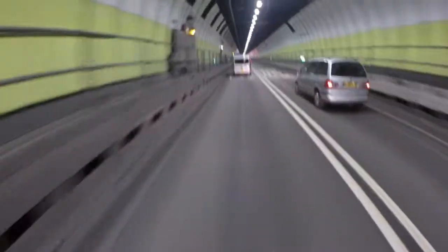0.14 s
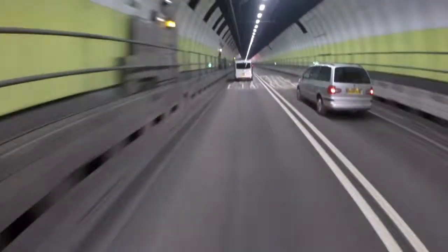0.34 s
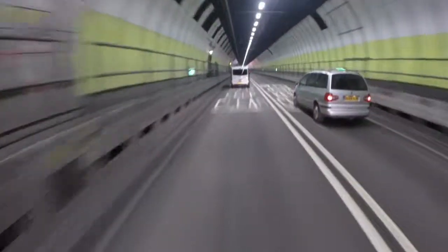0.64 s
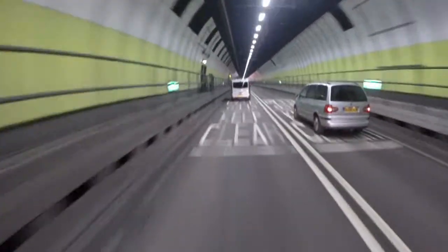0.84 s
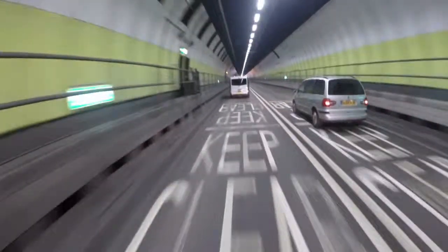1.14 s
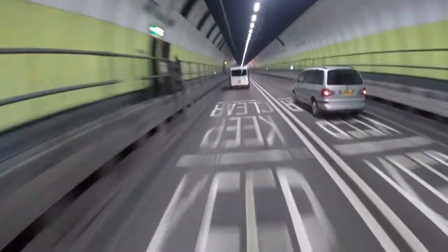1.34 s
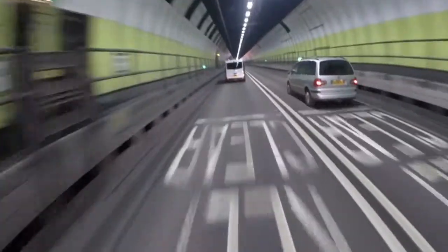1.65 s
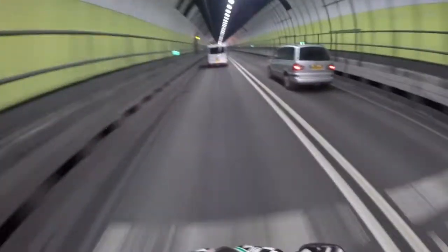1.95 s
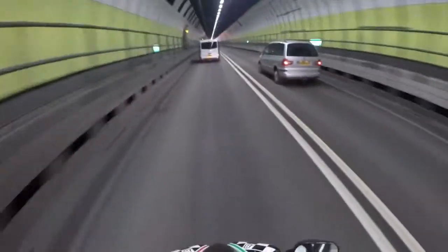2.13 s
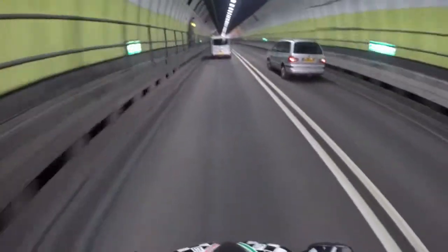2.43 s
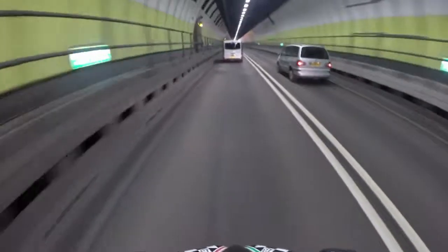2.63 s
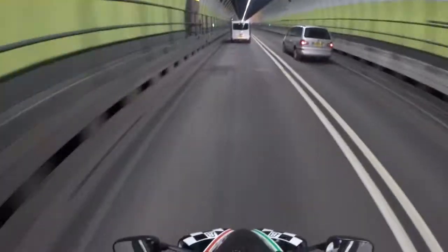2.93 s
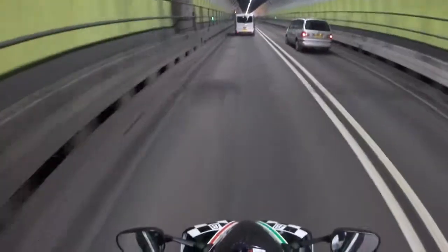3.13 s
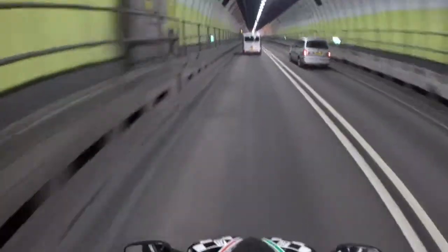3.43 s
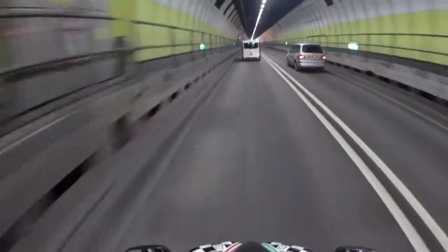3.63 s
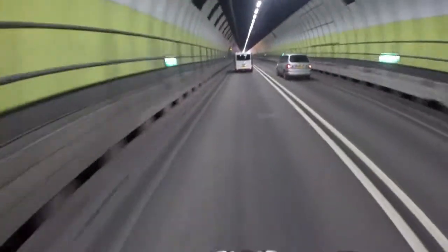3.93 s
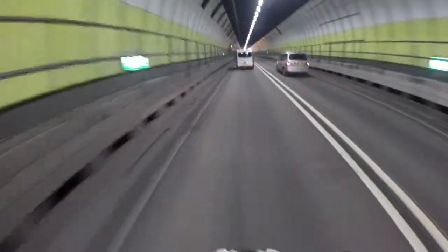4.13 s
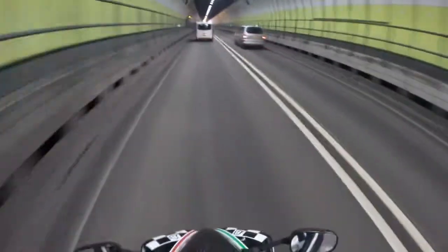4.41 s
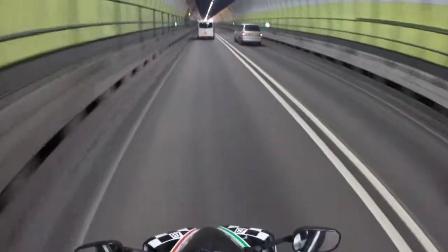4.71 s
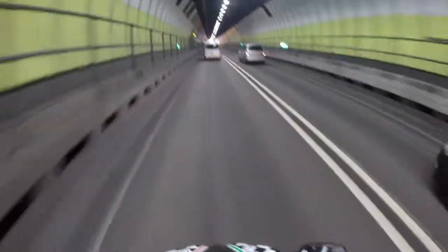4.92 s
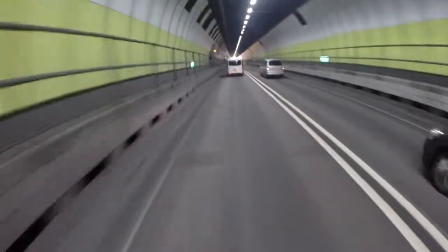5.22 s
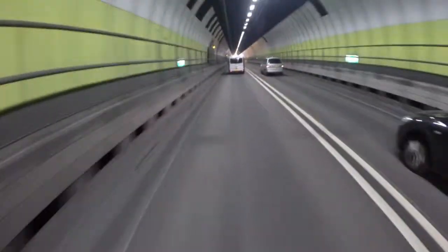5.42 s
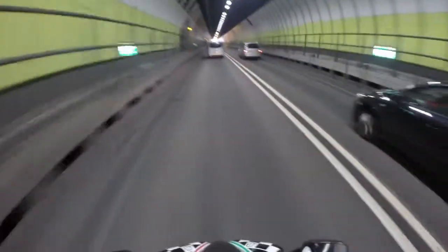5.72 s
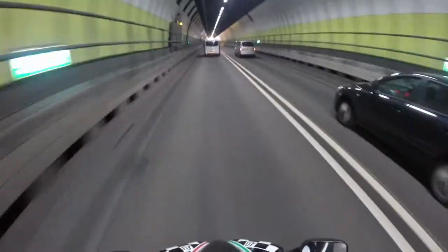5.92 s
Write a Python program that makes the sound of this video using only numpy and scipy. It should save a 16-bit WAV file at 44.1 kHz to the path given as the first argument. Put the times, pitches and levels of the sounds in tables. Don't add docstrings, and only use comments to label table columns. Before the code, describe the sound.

Inside an echoing road tunnel, a helmet microphone catches a twin-cylinder motorcycle with a loud open exhaust. From 0 to 4 seconds it coasts down, its deep uneven drone slowly sinking in pitch. Hard misfire thumps land near 0.8, 1.3, 2.1 and 2.3 seconds, with weaker pops between, and the burble is roughest from about 2.1 to 3.2. Tyre roar swells and fades, thin airy whines slide downward, and low wind gusts buffet the microphone, strongest near 3.1. Small grit ticks click at about 1.3 and 2.3. At 4.0 the gear changes: the note dips sharply, leaps up and wobbles through two clutch bites with clustered thumps until 4.8. Then the engine pulls away gently, steadier and slowly rising, with a pop near 5.5. A car drawing level adds brighter tyre hiss to the end at about 6 seconds. Big thumps momentarily duck everything.

```python
import sys
import numpy as np
from scipy import signal
from scipy.io import wavfile

SR = 44100
rng = np.random.default_rng(int(sys.argv[2]) if len(sys.argv) > 2 else 0)


def undo_db(level):
    steps = np.asarray(level, float) / 20
    return 10 ** steps


def bounce(signal):
    frames = np.transpose(np.atleast_2d(signal))
    limited = np.clip(frames, -1, 1)
    pcm = np.round(limited * 32767).astype(np.int16)
    wavfile.write(sys.argv[1], SR, pcm)


N = 267246

# (time [s], rate [cycles/s])
CRANK_SPEED = [(0, 34.2), (.15, 33.2), (.8, 31.7), (1.5, 29.95), (2.13, 28.65), (2.85, 26.9), (3.1, 27.1),
               (3.6, 26.4), (4.03, 26.8), (4.14, 23.1), (4.25, 31.1), (4.39, 27.9), (4.49, 30.6),
               (4.56, 29.5), (4.66, 31.2), (4.78, 30.2), (5.2, 30.9), (6.06, 32.5)]
# (time [s], throttle opening [0-1], level [dB])
THROTTLE = [(0, 0, -3), (.2, 0.05, 1), (.75, 0, -0.1), (.88, 0.1, -2.5), (1.35, 0.1, -1.5),
            (1.9, 0.13, 2.5), (2.3, 0, -1), (2.83, 0.3, 3.6), (2.95, 0.56, -1.5), (3.2, .95, -0.3),
            (4.05, 1, -1.3), (4.09, 0, -5), (4.2, 0.8, 2.5), (4.27, 0.4, -5), (4.41, 0.2, 2),
            (4.55, 0.23, -6.5), (4.72, 1, 1), (6.06, 0.8, -1)]
# (order [per cycle], throttle shut [dB], throttle open [dB])
LEAD_ORDERS = [(3, -18, -36.5), (5, -20.5, -15), (8, -22.5, -19.5), (7, -28.5, -23.5), (9, -31, -25),
               (13, -45, -30.5)]
# (order [per cycle], level re 7th lead [dB])
LOW_ORDERS = [(1, -16), (2, -11), (4, -8), (6, -4), (7, -1)]
# (order [per cycle], level re 9th lead [dB])
MID_ORDERS = [(9, 0), (10, -11), (11, -8)]
# (order [per cycle], level re 13th lead [dB])
HIGH_ORDERS = [(13, -1.5), (14, -3), (16, 2)]
# (frequency [Hz], gain [dB])
COLD_PIPE = [(100, 1.77), (136, -5.5), (160, 0.44), (186, -5.5), (204, 2), (224, .5), (246, -6),
             (300, -9.5)]
# (frequency [Hz], width [Hz], level [dB])
EXHAUST_MODES = [(150.8, 18.7, 1.5), (227.2, 117, -1), (371, 98, -9.5), (460, 38, -49)]
# (start [s], end [s], level over steady [dB])
ROUGH_SPELLS = [
    (-.2, .2, 8),
    (.75, 1.35, 3.5),
    (2.1, 2.7, 6.5),
    (2.7, 3.22, 8),
    (4.22, 4.4, 4),
    (4.35, 4.8, 6),
    (5.5, 6.3, 1.5),
]
# (time [s], peak [dB], ring [Hz])
MISFIRES = [(0.5766, -14, 202), (0.8136, -1, 170), (1.032, -13.5, 197), (1.337, -1, 155), (2.132, -1, 192),
            (2.2732, -3, 204), (2.419, -15, 212), (2.6083, -10, 198), (3.1835, -4.5, 200),
            (3.3077, -13, 207), (4.0242, -5, 202), (4.1826, -3.5, 127), (4.281, -3, 187), (4.36, -7.5, 157),
            (4.4002, -8, 220), (5.482, -5, 206)]
# (time [s], level [dB])
TRAFFIC = [(0, -27.5), (.15, -27.5), (.4, -32.5), (.55, -27), (.8, -27), (1.08, -28.5), (1.28, -25.5),
           (1.53, -31), (1.9, -25.5), (2.1, -29.5), (2.2, -32), (2.6, -31), (3.15, -26), (3.42, -32.5),
           (4.53, -30.5), (4.63, -27), (4.8, -29.5), (6.06, -29.5)]
# (frequency [Hz], density [dB/Hz])
ROAR_SPECTRUM = [(190, -6), (330, 1.5), (486, -7.5), (574, -7), (963, -0.5), (1070, -2), (1510, -15),
                 (2210, -22), (2450, -23.5), (3000, -19.5), (3900, -49), (6600, -120)]
# (time [s], length [s], level over calm [dB])
GUSTS = [
    (0, .2, 8),
    (.5, 0.13, -7.5),
    (1.283, .15, 7),
    (1.936, 0.11, 10.5),
    (2.43, 0.16, 11),
    (3.102, 0.095, 16.5),
    (4.42, 0.32, 3),
    (4.785, 0.13, 3.5),
    (5.59, 0.08, 5.5),
]
# (frequency [Hz], density [dB/Hz])
BUFFET_SPECTRUM = [(16, -8.5), (35, -7.5), (60, -5), (100, -6), (170, -26)]
# (frequency [Hz], density [dB/Hz])
HISS_SPECTRUM = [(1060, -11.5), (1800, 2.5), (2120, -13.5), (2760, -9), (3470, -10), (3980, -3), (4640, -5),
                 (5340, -7.5), (7400, -21.5), (9620, -49.5), (16300, -120)]
# (frequency [Hz], density [dB/Hz])
TOP_SPECTRUM = [(4120, -36.5), (7000, -13), (7740, -21), (9730, -0.5), (11800, -8), (13800, -13),
                (14800, -20)]
# (start [s], end [s], start pitch [Hz], end pitch [Hz], level [dB])
WHINES = [
    (.45, 1.38, 5480, 5320, -52),
    (.85, 1.38, 2880, 2650, -47),
    (1.6, 3.33, 2490, 2420, -48.5),
    (4.6, 6.3, 3900, 3950, -53),
    (4.7, 6.3, 5200, 5300, -55),
]
# (time [s], length [s], frequency [Hz], level [dB])
PUFFS = [(0.11, 0.019, 4800, -47), (0.802, 0.013, 5600, -49), (1.298, 0.097, 6000, -54.5),
         (2.267, 0.012, 4930, -54), (3.275, 0.016, 4770, -43.5), (3.106, 0.17, 880, -33.5),
         (3.416, 0.0053, 5200, -55), (4.6, 0.036, 3030, -62), (1.287, 0.0018, 1020, -25),
         (2.31, 0.005, 780, -33), (5.535, 0.0046, 990, -31)]
# (time [s], peak [dB])
TICKS = [
    (.002, -38),
    (1.309, -18),
    (1.338, -25.5),
    (2.268, -23),
    (2.69, -42.5),
    (5.003, -28),
]

SECOND_FIRING_CYCLES = 3 / 8
HEATS_S, HEATS_IN_S, HOT_STRETCH = 4.7, 0.24, 0.11
STEADY_BURN_DB, ROUGHENS_S = -29.5, 0.1
TUNNEL_T60_S, TUNNEL_DB = 0.96, -16.5
CALM_DB = -38
HISS_DB, TOP_DB = -48, -61
HISS_FOLLOWS, TOP_FOLLOWS = 0.5, 0.55
ALONGSIDE_S, CLOSES_IN_S, ALONGSIDE_HISS_DB, ALONGSIDE_TOP_DB = 4.97, 0.59, 4.5, 5
WHINE_BLUR = 0.05
LIMIT_DB, RELEASE_DB_PER_S, ATTACK_S = -7.5, 61.5, 0.00088


def rms_one(x):
    return x / np.sqrt(np.mean(x ** 2) + 1e-20)


def in_time(rows):
    s, *columns = np.transpose(rows)
    return [np.interp(np.arange(N) / SR, s, c) for c in columns]


def spells(rows, edge_s):
    t = np.arange(N) / SR
    plateaus = [high * np.clip(np.minimum(t - start, end - t) / edge_s, 0, 1) for start, end, high in rows]
    return np.max(plateaus, axis=0)


def drift(rate_hz):
    r = np.exp(-80 * np.pi * rate_hz / SR)
    white = rng.standard_normal(N // 40 + 2002)
    slow = signal.lfilter([1], [1, -2 * r, r * r], white)[2000:]
    return np.interp(np.arange(N) / 40, np.arange(len(slow)), rms_one(slow))


def resonance(x, hz, width_hz):
    r = np.exp(-np.pi * width_hz / SR)
    zeros = np.array([1, 0, -1]) * (1 - r * r) / 2
    return signal.lfilter(zeros, [1, -2 * r * np.cos(2 * np.pi * hz / SR), r * r], x)


def banded_noise(spectrum, patchy_db, rate_hz):
    points_hz, points_db = np.transpose(spectrum)
    edges_hz = points_hz[0] * 2 ** np.arange(0, np.log2(points_hz[-1] / points_hz[0]), 1 / 3)
    together = drift(rate_hz)
    white = rng.standard_normal((2, N))
    out = 0
    for k, (low, high) in enumerate(zip(edges_hz, edges_hz[1:])):
        sos = signal.butter(2, [low, high], "band", fs=SR, output="sos")
        band = signal.sosfilt(sos, white[k % 2])
        level_db = np.interp(np.log(low * high) / 2, np.log(points_hz), points_db)
        flicker_db = patchy_db * (together + 0.86 * drift(3 * rate_hz))
        out = out + undo_db(level_db + flicker_db) * band
    return rms_one(out)


def engine():
    cycles_per_s = in_time(CRANK_SPEED)[0]
    cycles = np.cumsum(cycles_per_s) / SR
    uneven_db = STEADY_BURN_DB + spells(ROUGH_SPELLS, ROUGHENS_S)
    return firing_orders(cycles_per_s, cycles, uneven_db) + undo_db(uneven_db) * burn_scatter(cycles)


def firing_orders(cycles_per_s, cycles, uneven_db):
    throttle, level_db = in_time(THROTTLE)
    flutter_db = 1.2 + 0.25 * (uneven_db + 29)
    heated = 0.5 + 0.5 * np.tanh((np.arange(N) / SR - HEATS_S) / HEATS_IN_S)
    stretch = 1 + HOT_STRETCH * heated
    leads_db = []
    for order, shut_db, open_db in LEAD_ORDERS:
        pipe_db = np.interp(order * cycles_per_s / stretch, *np.transpose(COLD_PIPE))
        leads_db.append(shut_db + throttle * (open_db - shut_db) + pipe_db)
    third_db, fifth_db, eighth_db, low_db, mid_db, high_db = leads_db
    orders = [(3, third_db, 0.05), (5, fifth_db, 0.37), (8, eighth_db, 0.83)]   # order, dB, wander [rad]
    for table, lead_db in ((LOW_ORDERS, low_db), (MID_ORDERS, mid_db), (HIGH_ORDERS, high_db)):
        orders += [(order, lead_db + db, 1.0) for order, db in table]
    out = 0
    for order, db, wander in orders:
        both_cylinders = 1 + 1.08 * np.exp(-2j * np.pi * order * SECOND_FIRING_CYCLES)
        phase = np.angle(both_cylinders) + wander * drift(0.6)
        db = db + level_db + flutter_db * drift(24) + 3.26 * wander ** 3 * drift(6.9)
        out = out - np.sqrt(2) * undo_db(db) * np.cos(2 * np.pi * order * cycles + phase)
    return out


def burn_scatter(cycles):
    fired = sum(np.diff(np.floor(cycles - lag), prepend=0) != 0 for lag in (0, SECOND_FIRING_CYCLES))
    afterburn = rng.random(N) < 170 / SR
    return rms_one(exhaust((rng.standard_normal(N) - 0.4) * (fired + 0.9 * afterburn)))


def exhaust(pulses):
    out = 0
    for hz, width_hz, db in EXHAUST_MODES:
        once = resonance(pulses, hz, width_hz)
        out = out + undo_db(db) * resonance(once, hz, width_hz)
    return out


def thumps():
    out = np.zeros(N)
    t = np.arange(-400, 900) / SR
    for s, db, hz in MISFIRES:
        i = round(s * SR)
        fade = np.exp(-(t * hz / np.where(t < 0, 0.45, 0.8)) ** 2)
        out[i - 400:i + 900] -= undo_db(db) * fade * np.cos(2 * np.pi * hz * t)
    return out


def tunnel(x):
    t = np.arange(round(1.5 * SR)) / SR
    cloud = rng.standard_normal(len(t)) * undo_db(-60 * t / TUNNEL_T60_S) * (t > 0.015)
    return signal.fftconvolve(x, cloud / np.sqrt(np.sum(cloud ** 2)))[:N]


def tyre_roar():
    roar_db = in_time(TRAFFIC)[0]
    return undo_db(roar_db + 3.5) * banded_noise(ROAR_SPECTRUM, patchy_db=-1.12, rate_hz=47)


def wind_buffet():
    t = np.arange(N) / SR
    gust_db = CALM_DB + sum(db * np.exp(-((t - s) / length_s) ** 2) for s, length_s, db in GUSTS)
    return undo_db(gust_db + 6) * banded_noise(BUFFET_SPECTRUM, patchy_db=3.3, rate_hz=36)


def air_hiss():
    roar_db = in_time(TRAFFIC)[0]
    swing_db = roar_db - roar_db.mean()
    near = 0.5 + 0.5 * np.tanh((np.arange(N) / SR - ALONGSIDE_S) / CLOSES_IN_S)
    hiss_db = HISS_DB + 4 + HISS_FOLLOWS * swing_db + ALONGSIDE_HISS_DB * near
    top_db = TOP_DB + TOP_FOLLOWS * swing_db + ALONGSIDE_TOP_DB * near
    hiss = undo_db(hiss_db) * banded_noise(HISS_SPECTRUM, patchy_db=1.0, rate_hz=48)
    return hiss + undo_db(top_db) * banded_noise(TOP_SPECTRUM, patchy_db=1.4, rate_hz=30)


def whines():
    t, out = np.arange(N) / SR, np.zeros(N)
    for start, end, start_hz, end_hz, db in WHINES:
        swell = np.clip(np.minimum(t - start, end - t) / 0.058, 0, 1)
        sos = signal.butter(2, WHINE_BLUR * start_hz / 2, fs=SR, output="sos")
        a, b = signal.sosfilt(sos, rng.standard_normal((2, N)))
        turn = 2 * np.pi * np.cumsum(np.interp(t, [start, end], [start_hz, end_hz])) / SR
        tone = rms_one(a * np.cos(turn) + b * np.sin(turn))
        out += undo_db(db + drift(10)) * swell * tone
    return out


def puffs():
    t, white, out = np.arange(N) / SR, rng.standard_normal(N), np.zeros(N)
    for s, length_s, hz, db in PUFFS:
        air = rms_one(resonance(resonance(white, hz, hz), hz, hz))
        out += undo_db(db) * np.exp(-((t - s) / length_s) ** 2) * air
    return out


def grit_ticks():
    ticks = np.zeros(N)
    for s, db in TICKS:
        ticks[round(s * SR)] = undo_db(db)
    return signal.sosfilt(signal.butter(2, 3500, "high", fs=SR, output="sos"), ticks)


def scene():
    bike = engine() + thumps()
    echo = undo_db(TUNNEL_DB) * tunnel(bike)
    road = tyre_roar() + wind_buffet() + air_hiss()
    return (bike + echo + road + whines() + puffs() + grit_ticks())[None]


def roll_off(x):
    return signal.sosfilt(signal.butter(12, 15040, fs=SR, output="sos"), x)


def record(dry):
    ramp_db = RELEASE_DB_PER_S * np.arange(N) / SR
    over_db = np.maximum(20 * np.log10(np.abs(dry[0]) + 1e-9) - LIMIT_DB, 0)
    held_db = np.maximum.accumulate(over_db + ramp_db) - ramp_db
    r = np.exp(-1 / (ATTACK_S * SR))
    duck_db = signal.lfilter([1 - r], [1, -r], held_db)
    return roll_off(dry * undo_db(-duck_db))


dry = scene()
out = record(dry)
bounce(out)
```